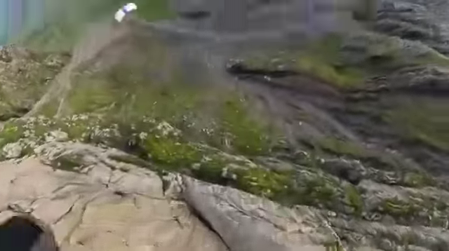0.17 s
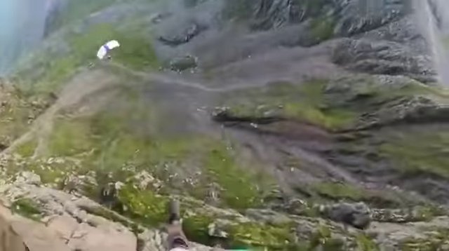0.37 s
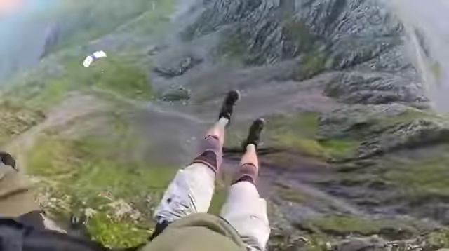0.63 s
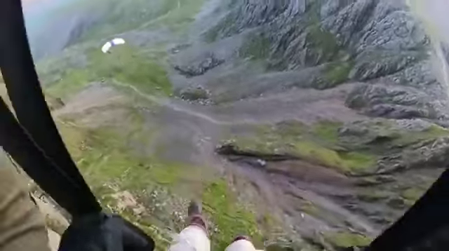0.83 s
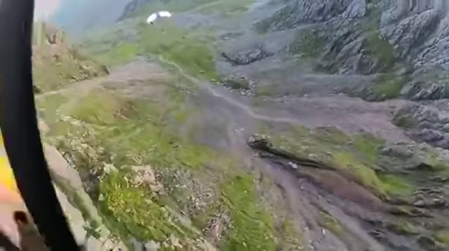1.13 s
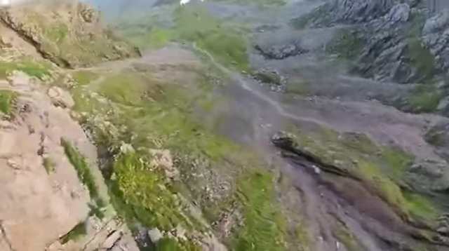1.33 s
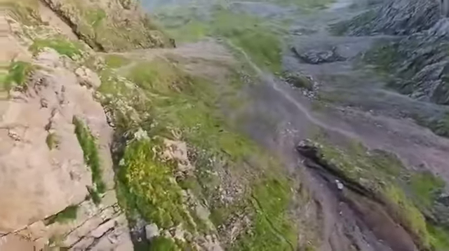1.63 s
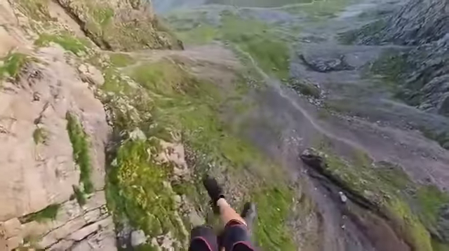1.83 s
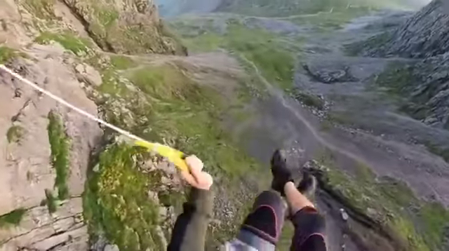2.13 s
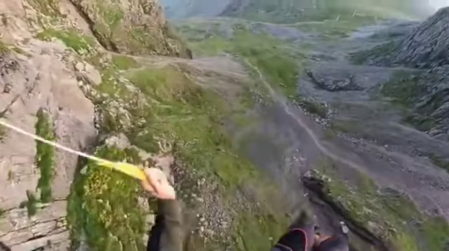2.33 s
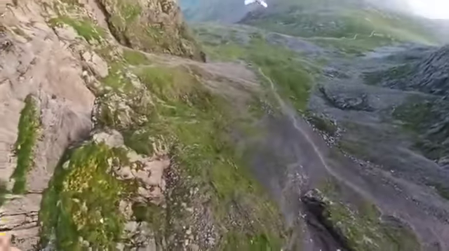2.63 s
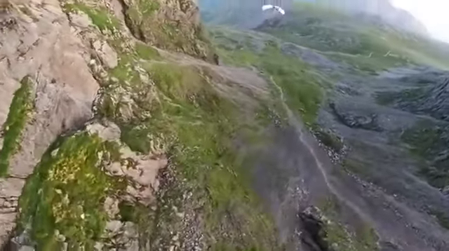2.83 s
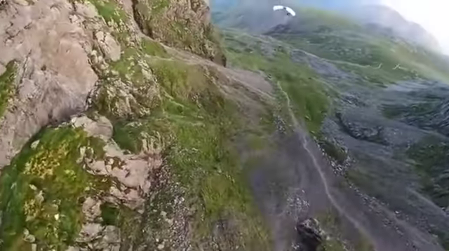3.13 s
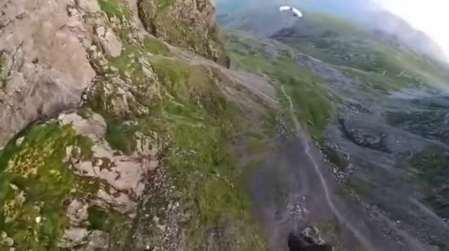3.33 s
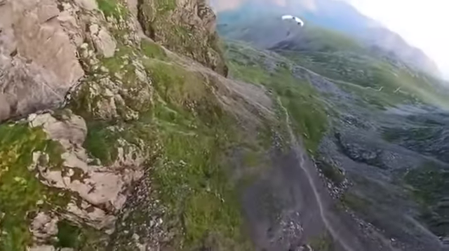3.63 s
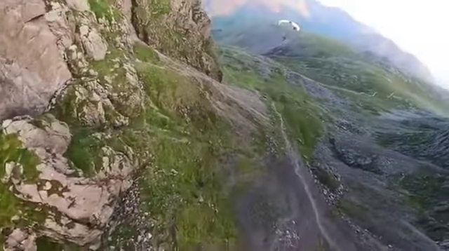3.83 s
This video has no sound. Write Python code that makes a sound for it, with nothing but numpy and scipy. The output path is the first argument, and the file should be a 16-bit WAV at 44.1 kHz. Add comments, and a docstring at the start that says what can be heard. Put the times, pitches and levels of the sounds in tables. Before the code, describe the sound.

Heavy, uneven wind overloads a close wearable microphone in open mountain air, with dull gear flaps and a brief webbing scrape, then a sudden lull, returning low buffeting, a faint airy whistle and late flaps.

```python
"""Wind roars and buffets under a thin high hiss that soon fades: a small body-worn camera microphone
during a jump off a cliff under a wing. Straps flap and scrape, the wind lulls, then builds again.
The wind is four layers of coloured noise, in bands that flicker; air over an edge is a wavering sine;
flaps are bursts of noise over a dull ring; scrapes are ragged clicks through resonant bands."""
import sys
import numpy as np
from scipy import signal
from scipy.fft import rfft, irfft
from scipy.io import wavfile
from scipy.ndimage import uniform_filter1d

SR = 44100
rng = np.random.default_rng(int(sys.argv[2]) if len(sys.argv) > 2 else 0)


def pcm_store(signal):
    """Save signal as 16-bit PCM."""
    levels = np.round(np.clip(np.atleast_2d(signal), -1, 1) * 32767)
    wavfile.write(sys.argv[1], SR, levels.astype(np.int16).T)


N = 176400  # 4 s


def undb(db):
    """Turn decibels into an amplitude factor."""
    return 10 ** (np.asarray(db) / 20)


def unit(x):
    """Scale x to an RMS of 1."""
    return x / np.sqrt(np.mean(x ** 2) + 1e-18)


def noise():
    """White noise over the whole scene."""
    return rng.standard_normal(N)


def colour(x, table):
    """Shape the spectrum of x by (Hz, dB) points on a log axis; all beyond them is cut by 120 dB."""
    hz, db = np.array(table, float).T
    f = np.arange(len(x) // 2 + 1) * SR / len(x) + 1e-3
    gain = undb(np.interp(np.log(f), np.log(hz), db, -120, -120))
    return irfft(rfft(x) * gain, len(x))


def hump(hz, width):
    """A rounded band around hz that is 12 dB down at width octaves to either side."""
    return [(hz * 2. ** (k * width), -12 * k * k) for k in np.linspace(-2, 2, 13)]


def band_noise(x, hz, width):
    """Pass x through one rounded band, at an RMS of 1."""
    return unit(colour(x, hump(hz, width)))


def walk(rate):
    """Random levels held for 1 / rate s, smoothed twice into a slow wander of RMS 1."""
    k = max(int(SR / rate), 2)
    steps = np.repeat(rng.standard_normal(N // k + 1), k)[:N]
    return unit(uniform_filter1d(uniform_filter1d(steps, k), k))


AIR_HZ, AIR_START_DB, AIR_FADE_DB_PER_S = 6670, -50.5, 33.5


def airy_hiss(t):
    """A high, narrow band of flickering noise that thins out steadily from the start."""
    air = band_noise(noise(), AIR_HZ, 0.3)
    return air * undb(AIR_START_DB - AIR_FADE_DB_PER_S * t + 4.7 * walk(30))


# air whistling broadly over an edge: (time [s], centre frequency [Hz], level [dB])
EDGE_WHISTLE = [(3.06, 1350, -60), (3.095, 1350, -41), (3.135, 1520, -39), (3.165, 1500, -49),
                (3.24, 1440, -43), (3.36, 1400, -58)]


def edge(t):
    """Air over an edge: a sine of wavering pitch, its strength shaken by low noise into a narrow band."""
    s, hz, db = np.array(EDGE_WHISTLE).T
    shake = 1 + .5 * band_noise(noise(), 40, 1.4)
    pitch_hz = np.interp(t, s, hz) * (1 + .02 * walk(55))
    tone = np.sin(2 * np.pi * np.cumsum(pitch_hz) / SR)
    return shake * tone * undb(np.interp(t, s, db) + 1.5 * walk(29))


SCRAPE_EDGE_S, SCRAPE_GRAINS_PER_S = 0.021, 4000
SCRAPE_TOP_HZ, SCRAPE_TOP_DB = 8650, -13
SCRAPE_SAG = .06  # share by which the ring starts above and ends below its centre
# webbing that scrapes: (start time [s], length [s], level [dB], centre frequency [Hz])
WEBBING_SCRAPES = [(1.294, 0.042, -47, 4000), (1.338, 0.043, -37, 5040), (1.385, 0.048, -46, 5240),
                   (1.47, 0.028, -51, 4770)]


def scrapes(t):
    """Dense, ragged stick-slip clicks ring the webbing; the ring sinks as the strap runs out."""
    out = np.zeros(N)
    for s, length, db, hz in WEBBING_SCRAPES:
        grit = noise()
        grains = rng.random(N) < SCRAPE_GRAINS_PER_S / SR
        clicks = grit * (0.41 + grains * 3) * undb(1.3 * walk(120))
        high = band_noise(clicks, hz * (1 + SCRAPE_SAG), 0.34)
        low = band_noise(clicks, hz * (1 - SCRAPE_SAG), 0.34)
        # crossfade from the high ring to the low one
        turn = np.clip((t - s) / length, 0, 1) * np.pi / 2
        ring = high * np.cos(turn) + low * np.sin(turn)
        body = undb(-1.5) * band_noise(clicks, 2200, 1.0)
        top = undb(SCRAPE_TOP_DB) * band_noise(clicks, SCRAPE_TOP_HZ, .35)
        # the ramps are at half height at the start and the end
        fade = np.clip(np.minimum(t - s, s + length - t) / SCRAPE_EDGE_S + .5, 0, 1)
        out += undb(db) * (ring + body + top) * fade
    return out


FLAP_ATTACK_S = 0.0025
FLAP_RUSTLE_DB, FLAP_RUSTLE_S = -13.5, 0.0073  # swell before and after the onset
FLAP_THUMP_DB, FLAP_THUMP_HZ, FLAP_THUMP_T60_S = 5, 260, .05  # level against the flap, mean pitch, decay
# flaps of cloth and straps:
# (time [s], level [dB], treble against body [dB], 60 dB decay time [s])
STRAP_FLAPS = [(0.59, -24, -21, 0.014), (0.619, -21.5, -22, 0.04), (0.625, -25.5, -16, 0.016),
               (0.729, -26, -36, 0.014), (0.74, -30, -32, 0.022), (0.754, -18.5, -24, 0.05),
               (0.774, -27, -20, 0.039), (0.787, -24, -22, 0.035), (0.812, -22.5, -24, 0.048),
               (1.211, -21, -37, 0.05), (1.227, -36, -19, 0.021), (1.312, -24, -24, 0.03),
               (1.342, -27, -24, 0.029), (1.555, -52, 3, 0.048), (1.725, -30.5, -16, 0.043),
               (1.787, -42.5, -17, 0.027), (3.501, -30.5, -14.5, 0.19), (3.786, -35, -10, 0.06)]


def flaps(t):
    """Each flap is a quick ragged crack inside a softer swell of rustle; the housing rings short and dull."""
    body = band_noise(noise(), 790, 1.765)
    treble = band_noise(noise(), 3940, 0.92)
    ragged = undb(3.5 * walk(300))
    out = np.zeros(N)
    for s, db, treble_db, t60 in STRAP_FLAPS:
        age = t - s
        since = np.clip(age, 0, 1)
        env = np.clip(age / FLAP_ATTACK_S, 0, 1) * undb(-60 * since / max(t60, .004))
        env += undb(FLAP_RUSTLE_DB) * np.exp(-(age / FLAP_RUSTLE_S) ** 2)
        crack = env * ragged * (body + undb(treble_db) * treble)
        # give every crack the energy of its envelope
        crack *= np.sqrt(np.mean(env ** 2) / np.mean(crack ** 2))
        thump_hz = FLAP_THUMP_HZ * (1 + 0.21 * rng.standard_normal())
        thump_level = undb(FLAP_THUMP_DB - 60 * since / FLAP_THUMP_T60_S)
        thump = np.sin(2 * np.pi * thump_hz * since) * thump_level
        out += undb(db) * (crack + thump)
    return out


def layer(table, shared_db, own_db, rate):
    """Coloured noise in half-octave bands: all follow the shared gusts and each flickers alone."""
    spec = rfft(colour(noise(), table))
    f = np.arange(N // 2 + 1) * SR / N + 1e-3
    first, last = int(2 * np.log2(table[0][0])), int(2 * np.log2(table[-1][0])) + 1
    out = 0
    for k in range(first, last + 1):
        # neighbouring bands crossfade in frequency
        share = np.clip(1 - abs(2 * np.log2(f) - k), 0, 1)
        out = out + irfft(spec * share, N) * undb(own_db * walk(rate))
    return unit(out * undb(shared_db))


ROAR_SPLIT_HZ = 338
# tilt of the roar: (time [s], lift of its upper part against its lower part [dB])
ROAR_BRIGHTNESS = [(1.6, 1), (2.3, -6), (3.0, -7.5), (3.5, 9), (4, 10)]


def tilt_roar(roar, t):
    """Split the roar in two and lift one part as the other drops, so that it darkens and brightens."""
    lowpass = signal.butter(2, ROAR_SPLIT_HZ, fs=SR, output="sos")
    deep = signal.sosfiltfilt(lowpass, roar)
    tilt = undb(np.interp(t, *np.array(ROAR_BRIGHTNESS).T) / 2)
    return deep / tilt + (roar - deep) * tilt


# rise and fall of the wind: (time [s], buffeting level [dB], roar level before its tilt [dB],
# rush level [dB], hiss level [dB])
WIND_LEVELS = [(0, -19.5, -17, -28, -46.5), (.17, -19.5, -19.5, -27.5, -40), (.5, -17.5, -19.5, -28, -43),
               (.56, -16, -16, -34, -52), (.62, -11.5, -13.5, -24, -49.5), (.68, -23.5, -23.5, -41, -54.5),
               (.74, -13, -15.5, -26.5, -51.5), (.8, -11.5, -15, -29.5, -49), (.84, -18, -19, -35.5, -51.5),
               (.885, -17.5, -18, -35, -49), (.91, -14.5, -16.5, -26.5, -38), (1.05, -20.5, -24, -27, -41),
               (1.24, -16.5, -20.5, -29, -45), (1.335, -20.5, -27.5, -40, -57),
               (1.37, -19.5, -21.5, -32.5, -52), (1.42, -18, -27, -37, -40), (1.44, -28, -33, -31, -46.5),
               (1.49, -36, -43, -44, -46), (1.515, -26.5, -24, -42, -49.5), (1.57, -31, -37, -41.5, -52),
               (1.605, -32.5, -46.5, -49, -60), (2.0, -33, -46.5, -57, -66),
               (2.19, -26, -40.5, -50.5, -60.5), (2.24, -18.5, -35.5, -48, -56.5),
               (2.5, -18, -28, -44.5, -55.5), (2.57, -17, -25, -39.5, -50), (3.05, -20, -30.5, -40, -57),
               (3.45, -19, -32, -39.5, -55), (3.65, -21, -28.5, -38, -56.5), (4, -18.5, -26.5, -33, -48)]
# spectral colour of each wind layer, from the deepest up: (frequency [Hz], relative density [dB per Hz])
BUFFET_COLOUR = [(15, -21.5), (30, -1), (62, -2.5), (120, -5), (260, -24)]
ROAR_COLOUR = [(80, -28), (150, 0.5), (220, -1), (330, -4.5), (550, -13.5), (1100, -26)]
RUSH_COLOUR = [(250, -32), (520, -1.5), (1100, -9), (2100, -17.5), (3200, -32.5)]
HISS_COLOUR = [(1500, -11), (2600, -2), (4000, -2.5), (5500, -10.5), (8000, -19), (10000, -28.5),
               (12500, -42.5)]


def wind(t):
    """Quick eddies shake roar, rush and hiss together; deep pressure swings at the port roughen them."""
    s, *levels_db = np.array(WIND_LEVELS).T
    buffet_level, roar_level, rush_level, hiss_level = (undb(np.interp(t, s, db)) for db in levels_db)
    # the first line gives amplitudes interpolated in dB; gust, eddy and swing below are weighted in dB
    gust, eddy = walk(24.1), walk(70)
    buffet = layer(BUFFET_COLOUR, 0 * t, 0.52, 9)
    swing = np.abs(uniform_filter1d(buffet, size=60))
    roar = layer(ROAR_COLOUR, 0.7 * gust + 1.6 * eddy + 1.7 * swing, 1.9, 25.93)
    roar = tilt_roar(roar, t)
    rush = layer(RUSH_COLOUR, 0.46 * gust + 0.92 * eddy + 0.55 * swing, 0.38, 21)
    hiss = layer(HISS_COLOUR, 0.71 * gust + 1.7 * eddy + 0.49 * swing, 1.0, 21)
    return buffet_level * buffet + roar_level * roar + rush_level * rush + hiss_level * hiss


def scene():
    """Mix all sources into one channel."""
    t = np.arange(N) / SR
    return (wind(t) + edge(t) + airy_hiss(t) + flaps(t) + scrapes(t))[None]


TOP_HZ = 12800


def record(dry):
    """The camera rounds the loudest peaks and cuts the top steeply."""
    rounded = np.tanh(1.1 * dry) / 1.1
    lowpass = signal.ellip(8, .2, 70, TOP_HZ, fs=SR, output="sos")  # .2 dB ripple, 70 dB cut
    return signal.sosfilt(lowpass, rounded)


dry = scene()
out = record(dry)
pcm_store(out)
```